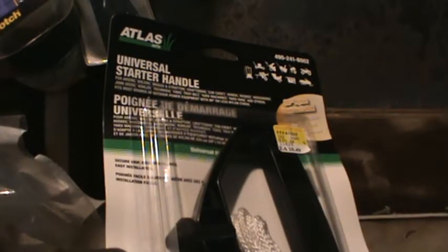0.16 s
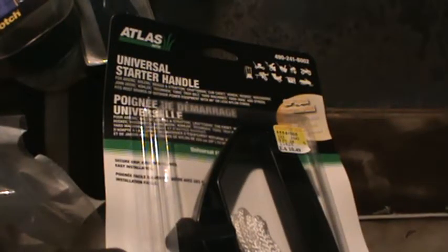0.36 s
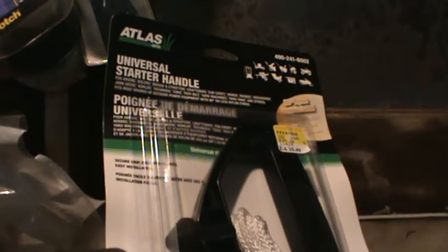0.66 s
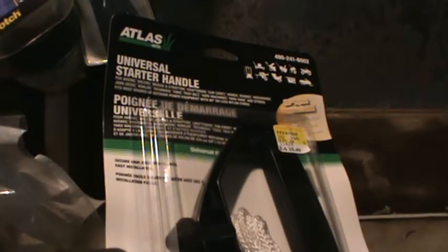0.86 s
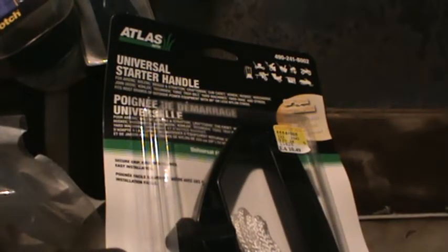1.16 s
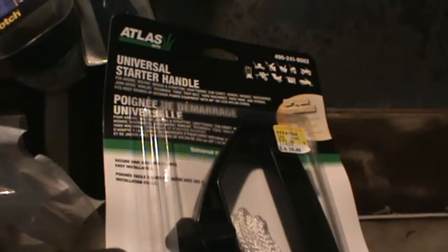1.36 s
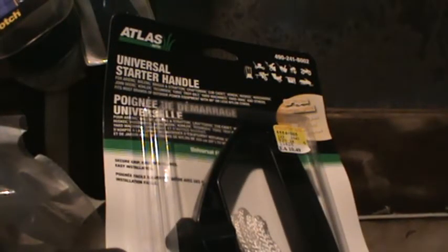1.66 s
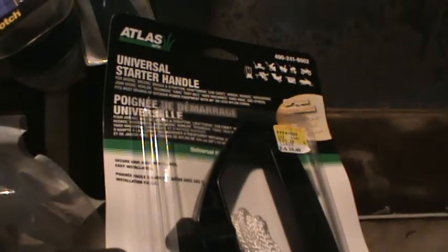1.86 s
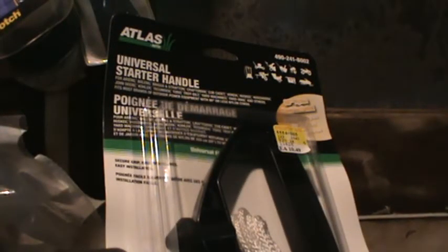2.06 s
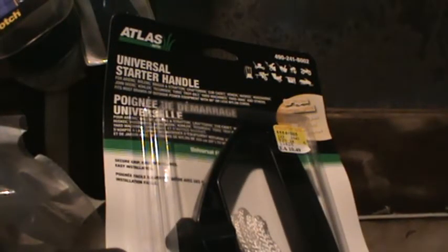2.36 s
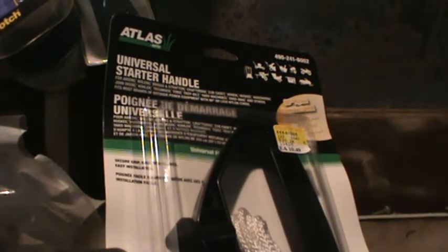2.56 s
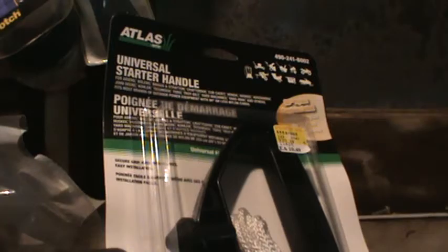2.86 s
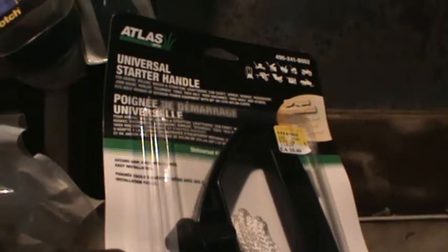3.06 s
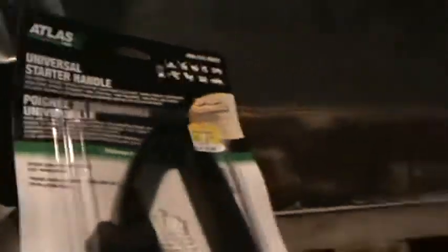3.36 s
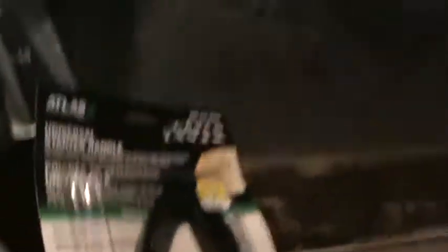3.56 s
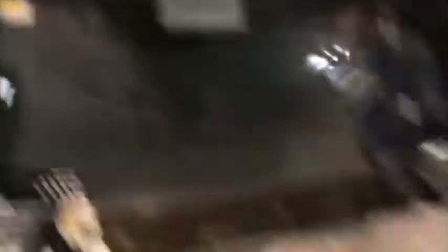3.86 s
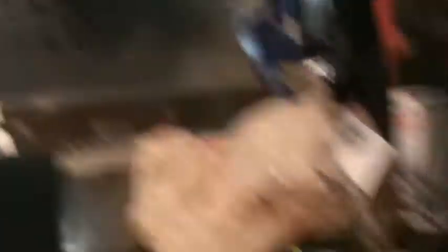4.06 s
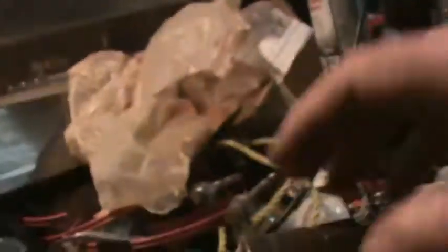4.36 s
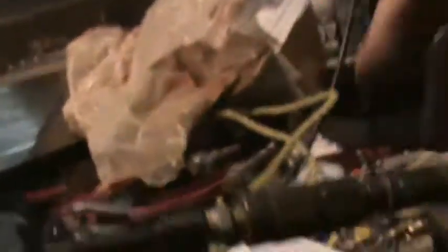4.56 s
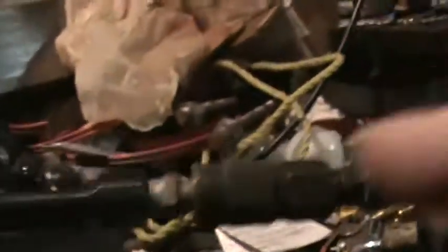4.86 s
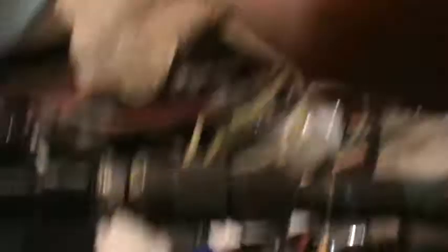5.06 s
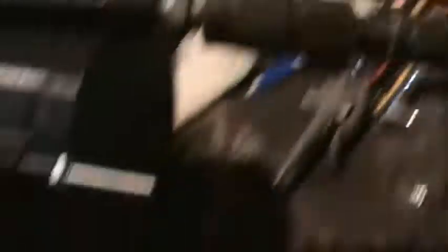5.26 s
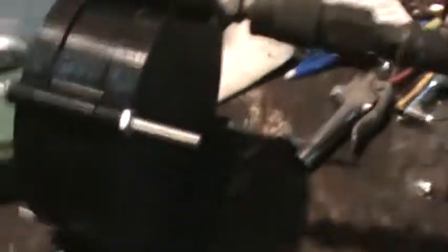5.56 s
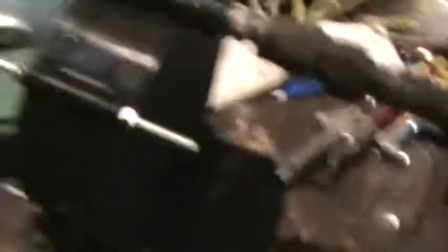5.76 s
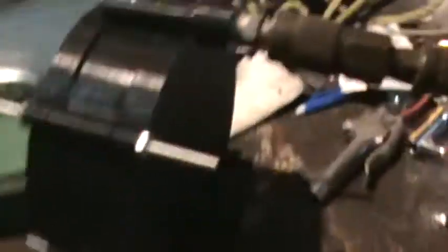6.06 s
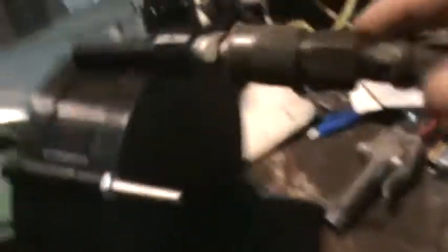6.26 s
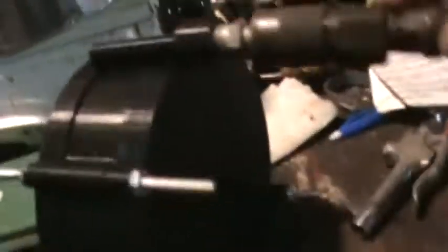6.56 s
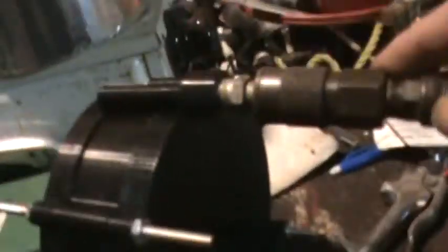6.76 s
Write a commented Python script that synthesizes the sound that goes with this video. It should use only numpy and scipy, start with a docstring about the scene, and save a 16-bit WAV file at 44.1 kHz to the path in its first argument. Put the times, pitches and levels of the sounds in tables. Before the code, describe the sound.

After a short blast, compressed air hisses steadily through a small plastic turbine whose low hum climbs in pitch.

```python
"""A workbench: an air gun hisses freely, shuts off, then opens again into a small plastic turbine.
The free jet and the exhaust are noise shaped by spectra and resonances, under slow random wobbles.
The rotor spins up, its throb a sum of seven multiples of the turn rate; ticks and bumps are short noise strikes.
The microphone starts turned away, then swings round to the turbine through its draught."""
import sys
import numpy as np
from scipy import signal
from scipy.fft import rfft, irfft, next_fast_len
from scipy.io import wavfile
from scipy.ndimage import uniform_filter1d, map_coordinates

SR = 44100
rng = np.random.default_rng(int(sys.argv[2]) if len(sys.argv) > 2 else 0)


def int16_out(signal):
    """Quantize to a 16-bit WAV file."""
    q = np.round(np.clip(np.atleast_2d(signal).T, -1, 1) * 32767)
    wavfile.write(sys.argv[1], SR, q.astype(np.int16))


N = 305172

# Rotor speed. Each row: time in seconds, speed in turns a second (Hz).
SPEED = [(0.75, 20.56), (0.95, 24.46), (1.2, 29.3), (1.49, 34.95), (1.73, 38.42), (1.97, 42.22),
         (2.36, 47.28), (2.76, 52.4), (3.29, 59.03), (3.79, 64.67), (4.15, 68.57), (4.34, 68.9),
         (5.3, 79.4), (5.89, 84.5), (6.2, 86.6), (6.34, 83.9), (6.85, 87.5), (6.92, 86)]
# Air flow, driving exhaust and draught. Each row: time in seconds, relative level in dB.
FLOW = [(0.92, -33), (1.0, -33), (2.32, -30.5), (2.47, -28.5), (2.94, -28), (5.42, -24.5), (6.92, -26)]
# Default stereo likeness. Each row: frequency in Hz, left-right correlation (-1 to 1).
ALIKE = [(30, .4), (120, 1), (500, 0.88), (2500, 0.88), (5000, 0.92), (7500, .62), (10000, 0.8),
         (15000, .72)]
OPEN_S = 0.72  # the valve opens again
SLIP_S, SLIP_LENGTH_S = 5.02, .55  # the nozzle slips off its seat
# crossing the edge of the draught, then its core: (start s, length s, gain dB)
DRAUGHT_EDGE, DRAUGHT_CORE, DRAUGHT_RAMP_S = (3.28, 1.4, 8.7), (3.9, 1.15, 24.7), 0.46


def amp(db):
    """Decibels to gain."""
    return 10 ** (np.asarray(db) / 20)


def unit(x):
    """Scale to rms 1."""
    return x / np.sqrt(np.mean(x ** 2) + 1e-20)


def along(points, hz):
    """Interpolate (Hz, value) points on a log frequency axis."""
    f, v = np.transpose(points)
    return np.interp(np.log(hz + 1), np.log(f + 1), v)


def curves(rows):
    """One value per sample for each column after the time."""
    s, *cols = np.transpose(rows)
    return [np.interp(np.arange(N) / SR, s, c) for c in cols]


def since(s):
    """Seconds since a moment, zero before it."""
    return np.maximum(np.arange(N) / SR - s, 0)


def wobble(rate_hz):
    """A smooth random curve, rate_hz knots a second."""
    knots = rng.standard_normal(int(N * rate_hz / SR) + 4)
    return map_coordinates(knots, [np.arange(N) * rate_hz / SR])


def swell(start_s, length_s, rise, fall):
    """Attack, hold and release between 0 and 1; the release begins after length_s."""
    return np.clip(np.minimum(since(start_s) / rise, 1 - since(start_s + length_s) / fall), 0, 1)


def flares(rows, rise=0.095, fall=0.18):
    """Gain in dB from (start s, length s, dB) rows; rise and fall in seconds."""
    return sum(db * swell(s, length, rise, fall) for s, length, db in rows)


def strikes(rows, t60, attack):
    """An envelope with one quick rise and decay for each (s, dB) row; t60 and attack in seconds."""
    ages = [(since(s), db) for s, db in rows]
    return sum(amp(db - 60 * age / t60) * (1 - np.exp(-age / attack)) for age, db in ages)


def filtered(x, response):
    """Multiply the spectrum of x by a response of frequency."""
    m = next_fast_len(N + 8192)
    return irfft(rfft(x, m) * response(np.fft.rfftfreq(m, 1 / SR)), m)[..., :N]


def resonance(f, centre_hz, width_hz):
    """Causal response of one mode."""
    return 1j * f * width_hz / (centre_hz ** 2 - f * f + 1j * f * width_hz)


def colour(spectrum, modes=()):
    """A broad spectrum with modes standing out of it, their powers added."""
    def response(f):
        peaks = sum(abs(amp(db) * resonance(f, hz, width)) ** 2 for hz, width, db in modes)
        return amp(along(spectrum, f)) * np.sqrt(1 + peaks)
    return response


def rush(response, alike=ALIKE):
    """Stereo noise of rms 1; the mid-side split sets the left-right correlation."""
    def mid_side(f):
        turn = np.arccos(np.clip(along(alike, f), -1, 1)) / 2
        return response(f) * np.array([np.cos(turn), np.sin(turn)])
    mid, side = filtered(rng.standard_normal((2, N)), mid_side)
    return unit(np.array([mid + side, mid - side]))


def ringing(centre_hz, width_hz):
    """Turbulence ringing in one resonance, applied twice."""
    return rush(lambda f: resonance(f, centre_hz, width_hz) ** 2)


def patchy(x, depth_db):
    """Reflections off the bench clutter shift, so narrow patches of the spectrum swell and fade."""
    z = signal.stft(x, nperseg=1024)[2]
    field = uniform_filter1d(rng.standard_normal(z.shape[1:]), size=3, axis=0)
    field = uniform_filter1d(field, size=36, axis=1)
    return unit(signal.istft(z * amp(depth_db * unit(field)), nperseg=1024)[1][:, :N])


def near_walls(x, wet_db, t60):
    """Quick reflections off the bench and wall put a fine, still ripple on the hiss."""
    t = np.arange(SR // 8) / SR
    tail = rng.standard_normal((2, len(t))) * amp(-60 * t / t60) * (t > .004)
    tail = tail[0] + np.array([[.4], [-.4]]) * tail[1]  # the two ports hear nearly the same echoes
    echoes = signal.fftconvolve(x, tail / np.linalg.norm(tail[0]), axes=1)[:, :N]
    return unit(x + amp(wet_db) * echoes)


def beamed(x, gain_db):
    """A gain on the sound that both ports share; their difference keeps its level."""
    return x + (amp(gain_db) - 1) * x.mean(axis=0)


def slid(x, shift_hz):
    """Move a band of noise up or down by a changing amount."""
    analytic = signal.hilbert(x, next_fast_len(N))[:, :N]
    return np.real(analytic * np.exp(2j * np.pi * np.cumsum(shift_hz) / SR))


def room_tone():
    """Steady coloured noise of the quiet workshop."""
    # Each row: frequency in Hz, relative density in dB.
    tone_spectrum = [(24, -46), (40, -17), (313, -4), (627, -8), (845, -2), (1140, -7), (2450, -11.5),
                     (2990, -16), (11100, -21), (15000, -31)]
    return amp(-52.0) * rush(colour(tone_spectrum))


def free_jet():
    """Open-jet turbulence: the roar thins as the trigger eases, then the pressure bleeds off and the valve seats."""
    # Each row: frequency in Hz, relative density in dB.
    jet_spectrum = [(60, -32), (250, -24.5), (700, -13.5), (1100, -11), (1900, -8), (2600, -3.5),
                    (3300, -2.5), (5400, -2), (7200, -6), (9300, 0), (11200, 0), (13500, -3), (15700, -3.5)]
    # Each row: frequency in Hz, width in Hz, level over the rush in dB.
    jet_modes = [(2670, 78, 5), (2960, 110, -10), (3920, 130, 3.5), (4960, 120, -2), (5380, 140, 5.5),
                 (9200, 90, -4), (10200, 100, -1), (10800, 240, 0), (11800, 100, 5), (12800, 160, -5),
                 (14300, 200, 1)]
    release_s, bleed_db_per_s = .39, 111
    seat_s, seat_db_per_s = 0.548, 525  # adds to the bleed
    pressure_db = -bleed_db_per_s * since(release_s) - seat_db_per_s * since(seat_s)
    thin = np.minimum(since(.24) / 0.086, 1)
    jet = colour(jet_spectrum, jet_modes)
    low = lambda f: 1 / (1 + (f / 3300) ** 8)  # power share of the roar
    roar = amp(-25.5 - 4.5 * thin) * rush(lambda f: jet(f) * np.sqrt(low(f)))
    hiss = near_walls(rush(lambda f: jet(f) * np.sqrt(1 - low(f))), wet_db=-8, t60=.05)
    last_squeeze = (.32, 0.057, 3)  # brightens the thinning hiss: start s, length s, gain dB
    hiss_db = -16.5 - 1.5 * thin + flares([last_squeeze], rise=0.037, fall=0.049)
    return amp(pressure_db) * (roar + amp(hiss_db + 0.52 * wobble(41.6)) * hiss)


def handling():
    """Soft bumps and the turbine's draught reach the microphone ports as low noise."""
    # Each row: time in seconds, relative thump level in dB, relative knock level in dB.
    bump_rows = [(.403, -40.5, -55), (0.478, -58, -35), (1.978, -24, -42), (3.371, -22.5, -18)]
    # Each row: frequency in Hz, relative density in dB.
    buffet_spectrum = [(20, -15), (45, -2), (90, 3), (200, -23), (500, -30), (1000, -60)]
    # Each row: frequency in Hz, relative density in dB.
    churn_spectrum = [(25, -53), (70, -20), (130, -2), (220, 1.5), (320, -1), (500, -15), (900, -27)]
    buffet_db, churn_db = draught()
    buffet = rush(colour(buffet_spectrum), [(30, -0.11), (250, 0.09)])
    churn = rush(colour(churn_spectrum), [(60, .2), (300, 0.79)])
    wind = amp(buffet_db + 0.95 * wobble(26)) * buffet + amp(churn_db + 2.5 * wobble(45)) * churn
    thump = rush(colour([(20, -15), (50, -8), (200, 3), (400, -14), (1000, -48)]))
    knock = rush(colour([(100, -15), (350, 2), (1050, -1), (1600, -25), (4000, -60)]))
    thumps = strikes([(s, db) for s, db, _ in bump_rows], t60=0.14, attack=0.0036) * thump
    knocks = strikes([(s, db) for s, _, db in bump_rows], t60=0.064, attack=0.0027) * knock
    return (np.arange(N) / SR > OPEN_S) * wind + thumps + knocks


def draught():
    """Buffet and churn levels in dB: they follow the flow and peak as the microphone crosses the exhaust."""
    flow_db, = curves(FLOW)
    crossing = lambda row: flares([row], DRAUGHT_RAMP_S, DRAUGHT_RAMP_S)
    return flow_db - 33 + crossing(DRAUGHT_CORE), flow_db - 13.5 + crossing(DRAUGHT_EDGE)


def spurt():
    """The valve opens again: a held gush of noise, and a burst once it is wide open."""
    # Each row: frequency in Hz, relative density in dB.
    spurt_spectrum = [(60, -26), (200, -5), (700, -22), (1200, -24), (1700, -10), (4100, -3.5), (5400, -6),
                      (7500, -5), (11200, -1.5), (15700, -7.5)]
    # Each row: frequency in Hz, width in Hz, level over the rush in dB.
    spurt_modes = [(5270, 120, 12), (11000, 50, 8.1), (12700, 70, 2), (14100, 120, 4)]
    valve_opens_s, gush_hold_s, gush_fall_db_per_s = .011, 0.14, 160
    cracked = np.minimum(since(OPEN_S - .004) / valve_opens_s, 1)
    gush = cracked * amp(-27 - gush_fall_db_per_s * since(OPEN_S + gush_hold_s))
    burst = strikes([(.734, -11)], t60=0.15, attack=0.0092)
    return (gush + burst) * rush(colour(spurt_spectrum, spurt_modes))


def exhaust(angle):
    """Air flow drives the housing rush, the inlet and the treble; the jet wavers on the blade edges."""
    flow_db, = curves(FLOW)
    swing_s, swing_takes_s = 3.84, .22  # middle, time constant
    facing = 1 / (1 + np.exp((swing_s - np.arange(N) / SR) / swing_takes_s))
    slip = swell(SLIP_S, SLIP_LENGTH_S, rise=0.045, fall=0.46)
    chop = 1 + .065 * np.cos(angle)
    flutter = amp(0.32 * wobble(70) + 0.52 * wobble(18))
    body = chop * amp(0.75 * wobble(120)) * housing_rush(angle, facing, slip)
    return amp(flow_db) * flutter * (body + inlet(facing, slip) + treble(slip))


def housing_rush(angle, facing, slip):
    """Turbulence rings the housing, the cavity (pumped once a turn) and the outlet."""
    # Each row: frequency in Hz, relative density in dB.
    away_spectrum = [(180, -28), (300, -11.5), (380, -15.5), (480, -5), (700, -9.5), (1150, -11.5),
                     (1800, -5.5), (2700, -5.5), (3600, -6.5), (4900, -5), (6900, -13.5), (8000, -17.5),
                     (10400, -19), (16000, -90)]
    # Each row: frequency in Hz, relative density in dB.
    toward_spectrum = [(250, -25), (420, -11.5), (560, -8.5), (880, -14), (1050, -9.5), (1200, -10),
                       (1500, -6), (2300, -5.5), (3500, -3), (5200, -4), (8000, -9), (10400, -21),
                       (16000, -90)]
    # Each row: frequency in Hz, width in Hz, level over the rush in dB.
    away_modes = [(503, 56, -8), (776, 200, 3), (1327, 42, 3), (1660, 81, -2), (2422, 84, 3)]
    # Each row: frequency in Hz, width in Hz, level over the rush in dB.
    housing_modes = [(1027, 23, 9.5), (1452, 60, 2.5), (1670, 26, -8), (2120, 84, -11), (2460, 28, 3.5),
                     (2705, 92, 1), (3300, 80, -3.5)]
    # By way of the room. Each row: frequency in Hz, left-right correlation (-1 to 1).
    away_alike = [(300, 1), (1000, 0.89), (5000, 0.93), (7500, 0.44)]
    # Heard directly. Each row: frequency in Hz, left-right correlation (-1 to 1).
    toward_alike = [(400, 0.79), (1500, 0.97), (4000, 0.98), (6000, 0.86), (7500, 0.73)]
    # The cavity rings harder. Each row: start in seconds, length in seconds, gain in dB.
    hoot_rows = [(3.08, 0.11, 6.5), (3.34, 0.36, 3), (4.78, 0.14, 12), (6.27, 0.13, 13)]
    away = near_walls(rush(colour(away_spectrum, away_modes), away_alike), wet_db=-8, t60=0.044)
    toward = patchy(rush(colour(toward_spectrum, housing_modes), toward_alike), depth_db=2)
    air = np.sqrt(1 - facing) * away + np.sqrt(facing) * toward
    cavity_db = -4 - 15.5 * facing + flares(hoot_rows) + 1.8 * wobble(45)
    cavity = (1 + 0.3 * np.cos(angle)) * amp(cavity_db) * ringing(2010, 190)
    outlet_db = -15 + 12.5 * swell(*DRAUGHT_EDGE[:2], DRAUGHT_RAMP_S, fall=1.0)
    outlet = amp(outlet_db) * patchy(ringing(1540, 770), depth_db=4.5)
    return amp(5.5 - 1 * slip) * air + cavity + outlet  # less air enters during the slip


def inlet(facing, slip):
    """Inlet resonances rush and whistle as the hand-held nozzle wanders and catches an edge."""
    # The inlet rushes louder. Each row: start in seconds, length in seconds, gain in dB.
    gust_rows = [(2.54, 0.31, 8.5), (3.92, 0.47, 5), (6.1, .6, 5.5)]
    # The inlet whistles. Each row: start in seconds, length in seconds, gain in dB.
    whistle_rows = [(2.72, 0.75, 9), (4.22, .44, 14), (5.08, 1.8, 10.5), (6.16, .12, 3.5), (6.38, .25, 3)]
    inlet_air = patchy(ringing(4100, 750), depth_db=1.0)
    inlet_air = amp(-13) * beamed(inlet_air, 5 * facing + flares(gust_rows))
    whistle = amp(-13.5 + wobble(25)) * beamed(ringing(4615, 200), flares(whistle_rows))
    howl_fade_db_per_s = 11
    howling = slip * amp(3 - howl_fade_db_per_s * since(SLIP_S)) * howl()
    return inlet_air + howling + whistle


def howl():
    """A resonance of the inlet that slides down while the nozzle slips."""
    sag_hz_per_s = 710
    return slid(ringing(4230, 602), -sag_hz_per_s * np.minimum(since(SLIP_S), SLIP_LENGTH_S))


def treble(slip):
    """Jet fizz and sizzle follow the nozzle's aim; the slip sizzles on the rim and shifts the fizz up."""
    # Each row: frequency in Hz, relative density in dB.
    fizz_spectrum = [(5500, -26), (8200, -6), (9100, -1), (10100, 1), (11100, -2.5), (12300, -8.5),
                     (14000, -20), (16000, -28)]
    # Each row: frequency in Hz, relative density in dB.
    sizzle_spectrum = [(7000, -23.5), (11500, -0.5), (13300, 1.5), (14500, -4), (16000, -5.5)]
    # Each row: frequency in Hz, left-right correlation (-1 to 1).
    fizz_alike = [(7500, 0.24), (9500, 0.71), (11500, 0.75), (14000, 0.61)]
    # Surges of fizz. Each row: start in seconds, length in seconds, gain in dB.
    surge_rows = [(2.5, 0.27, 1), (2.75, 0.23, 6.5), (3.18, .15, 6), (3.46, 0.69, 2.5), (6.36, 0.37, 1)]
    aim_db = flares(surge_rows) - 3.5 * slip
    rim_db = 7 * swell(5.02, 0.42, rise=0.18, fall=0.63)
    reseated_hz = 399 * np.minimum(since(SLIP_S) / SLIP_LENGTH_S, 1)
    fizz = slid(rush(colour(fizz_spectrum), fizz_alike), reseated_hz)
    fizz = beamed(patchy(fizz, depth_db=2.0), aim_db)
    sizzle = patchy(rush(colour(sizzle_spectrum), fizz_alike), depth_db=1.0)
    sizzle = amp(-8) * beamed(sizzle, 0.84 * aim_db + rim_db)
    jump_db = 4 * swell(SLIP_S, .09, rise=.025, fall=.08)  # treble dips as the nozzle jumps off
    lean_db = 1.5 * np.array([[.5], [-.5]])  # to the left
    return amp(2.5 - jump_db + lean_db + 0.31 * wobble(150)) * (fizz + sizzle)


def rotor(angle):
    """Push-pull puffs once a turn; the small outlet radiates low frequencies poorly."""
    # First to seventh multiple of the rotor speed. Each entry: relative level in dB before radiation.
    order_levels_db = [-1.5, 2.5, 0.5, -6.5, -13.5, -39, -22.5]
    speed_hz, = curves(SPEED)
    lag_rad = np.array([[-.2], [.2]])  # between the two microphone ports
    radiated = lambda hz: hz ** 2 / (hz ** 2 + 135 ** 2)
    sizes = [amp(db) * radiated(order * speed_hz) for order, db in enumerate(order_levels_db, 1)]
    puffs = -sum(size * np.sin(order * angle + lag_rad) for order, size in enumerate(sizes, 1))
    puffs = puffs / np.sqrt(np.sum(np.square(sizes), axis=0) / 2)
    ref_hz, db_per_octave = 87.6, 12.5
    start_loss_db = 6.5 * np.exp(-since(OPEN_S) / 0.83)  # weaker while the rotor gets going
    throb_db = -24.5 + db_per_octave * np.log2(speed_hz / ref_hz) - start_loss_db
    return amp(throb_db + 0.53 * wobble(30)) * puffs * amp([[-1.1], [1.1]])


def ticks():
    """The nozzle ticks and spits against the inlet: each bright crack rings the cavity."""
    # Each row: time in seconds, relative crack level in dB, ring relative to crack in dB.
    tick_rows = [(.989, -25, -1.5), (1.265, -17, -7), (1.329, -17, 6), (1.337, -24, -6), (1.774, -15, 1),
                 (1.883, -26, -11), (1.928, -18, -10), (1.977, -8, -15)]
    crack = strikes([(s, db) for s, db, _ in tick_rows], t60=0.039, attack=0.0005)
    ring = strikes([(s, db + ring_db) for s, db, ring_db in tick_rows], t60=0.056, attack=.001)
    bright = rush(colour([(300, -9), (2500, 4.5), (9000, -4.5), (16000, -12)]))
    return amp(-6) * crack * bright + amp(-5.5) * ring * ringing(2050, 530)


def scene():
    """The jet, the turbine once the valve is open, and the quiet workshop."""
    # Each row: time in seconds, left minus right in dB.
    pan_rows = [(0.0, -2), (0.73, -1), (0.85, 0), (3.45, -0.5), (3.7, -3.5), (4.12, 2.5), (5.86, 0.5),
                (6.92, 0)]
    angle = 2 * np.pi * np.cumsum(curves(SPEED)[0]) / SR
    valve = np.clip((np.arange(N) / SR - OPEN_S) / 0.021, 0, 1)
    air = free_jet() + spurt() + valve * exhaust(angle) + ticks()
    air = air * amp(np.outer([.5, -.5], curves(pan_rows)[0]))
    return air + valve * rotor(angle) + handling() + room_tone()


def record(dry):
    """The camera keeps nothing above its band limit."""
    top_hz = 15800
    return filtered(dry, lambda hz: hz < top_hz)


dry = scene()
out = record(dry)
int16_out(out)
```